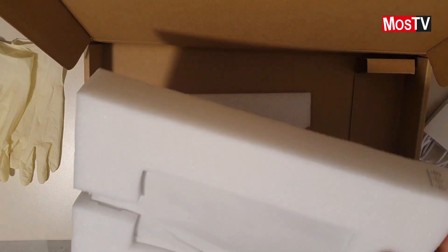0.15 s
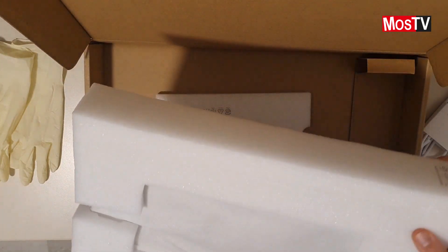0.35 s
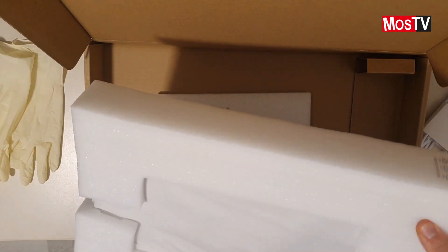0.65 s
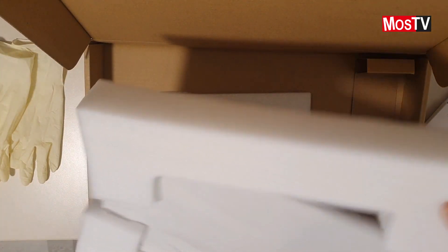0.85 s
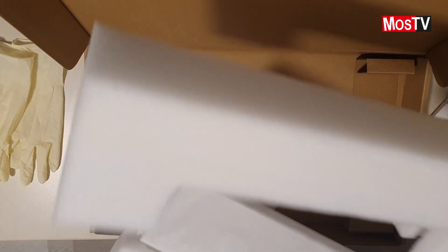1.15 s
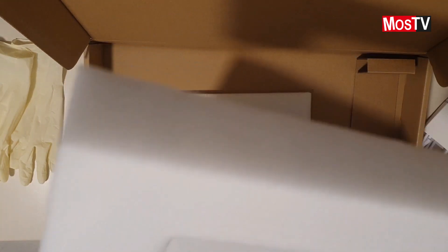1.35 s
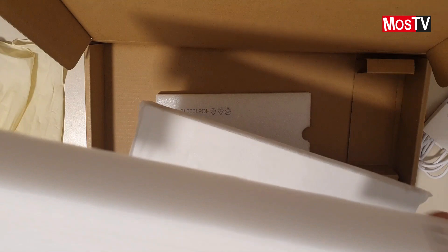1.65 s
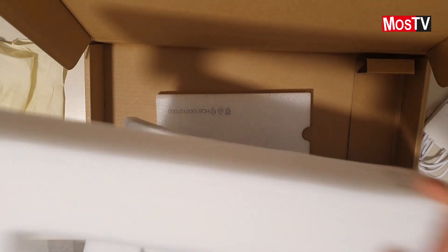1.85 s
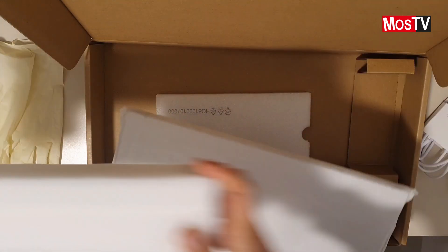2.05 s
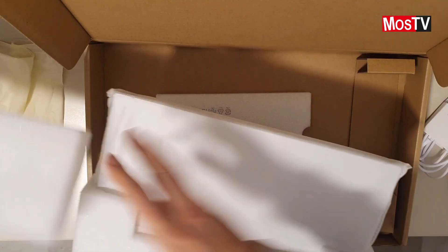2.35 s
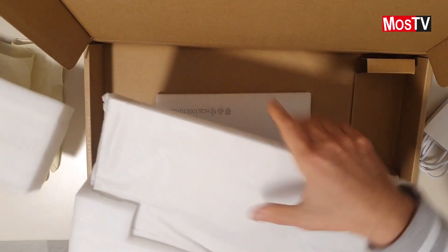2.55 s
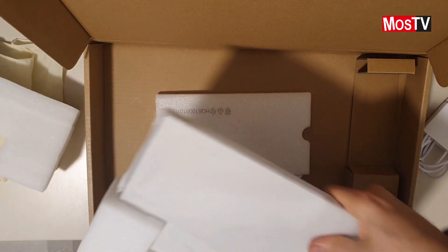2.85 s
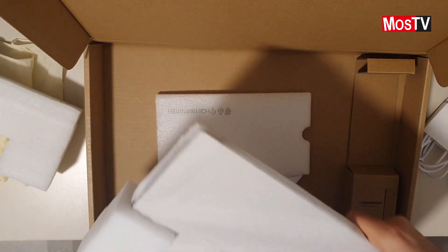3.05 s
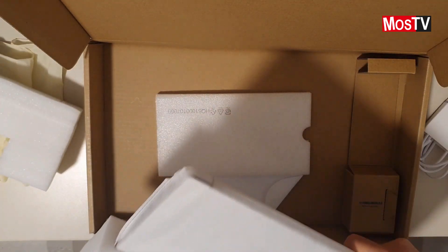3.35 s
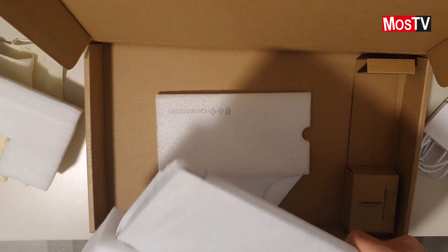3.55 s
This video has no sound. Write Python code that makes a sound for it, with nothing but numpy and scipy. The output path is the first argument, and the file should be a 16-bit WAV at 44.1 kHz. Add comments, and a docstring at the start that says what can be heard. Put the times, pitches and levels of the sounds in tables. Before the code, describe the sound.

Close up in a small room, a foam insert rubs loudly out of a hollow cardboard box, goes nearly quiet, lands with a low hollow thump, and a second piece knocks lightly and slides.

```python
"""Three strong scrapes as a foam insert is worked out of a cardboard box, then a faint hiss as it is carried
off. A hand brushes the foam with a tiny squeak, the insert thumps on the table with early reflections, and a
second piece is knocked and slid out. Rubs are coloured noise from dense random slips; knocks, crunches and
booms are short pulses and noise with decaying modes of box and table. A small room answers with tails of
decaying noise; steady low noise is its air."""
import sys
import numpy as np
from scipy import signal
from scipy.fft import rfft, irfft, next_fast_len
from scipy.io import wavfile
from scipy.ndimage import map_coordinates

SR = 44100
rng = np.random.default_rng(int(sys.argv[2]) if len(sys.argv) > 2 else 0)


def bounce(signal):
    """Save signal as a 16-bit WAV file at the path given by the first command-line argument."""
    frames = np.transpose(np.atleast_2d(signal))
    limited = np.clip(frames, -1, 1)
    pcm = np.round(limited * 32767).astype(np.int16)
    wavfile.write(sys.argv[1], SR, pcm)


N = 163170  # length in samples

# friction
SLIPS_PER_S, TILT_FROM_HZ = 14000, 2200
FLUTTER_DB, FLUTTER_PER_S = 1.6, 50
PATCHES_PER_OCTAVE, FLUTTER_FROM_HZ = 4, 600
LID_ECHO, LID_DELAY_S, LID_SWAY_S = 0.21, 0.004, 0.0006  # echo gain, delay and random change of delay
SCRAPE_FALL_S, GLIDE_FALL_S, BRUSH_FALL_S, SLIDE_FALL_S = 0.068, 0.12, 0.09, 0.15  # time to fade by 20 dB
HISS_DB = 1
SQUEAK_HZ, SQUEAK_SAG_HZ_PER_S, SQUEAK_JITTER_HZ = 1170, 900, 32
FLEX_RISE_S, FLEX_HOLD_S, FLEX_FALL_S = 0.073, 0.014, 0.14
# impacts
CRUNCH_T60_S, CRUNCH_DB = 0.074, -9
CRACK_T60_S, CRACK_DB = 0.02, 4.5  # the first snap of the crunch
KNOCK_DB, RING_DB = 9.5, -26.5
BOOM_RISE_S, RING_RISE_S = 0.015, 0.0017
BOOM_LAG_S, BOX_LAG_S = 0.00037, 0.00065  # left-right lag: fixed for the table, random spread for the box
# room and output
AIR_DB, RUB_ROOM_DB, IMPACT_ROOM_DB = -68, -8.5, 4.5
WALL_DELAY_S, TOP_HZ = 0.0016, 15800


def amp(db):
    """Decibels to gain."""
    return 10 ** (np.asarray(db) / 20)


def unit(x):
    """Scale to rms 1."""
    return x / np.sqrt(np.mean(x ** 2) + 1e-20)


def along(points, hz):
    """(Hz, value) points read on a log frequency axis."""
    f, v = np.transpose(points)
    return np.interp(np.log(hz + 1), np.log(f + 1), v)


def filtered(x, response):
    """x times a response of frequency."""
    n = x.shape[-1]
    m = next_fast_len(n + SR // 4)
    spectrum = rfft(x, m) * response(np.fft.rfftfreq(m, 1 / SR))
    return irfft(spectrum, m)[..., :n]


def spread(pair, alike):
    """Two unrelated signals become left and right of a given likeness."""
    turn = lambda hz: np.arccos(np.clip(along(alike, hz), -.99, .99)) / 2
    mid, side = filtered(pair, lambda hz: np.array([np.cos(turn(hz)), np.sin(turn(hz))]))
    return np.array([mid + side, mid - side])


def coloured(pair, colour, alike):
    """Stereo sound with the given spectrum and a middle of rms 1."""
    x = spread(filtered(pair, lambda hz: amp(along(colour, hz))), alike)
    return x / x.mean(0).std()


def pulse(colour, size=4096):
    """A causal, minimum-phase pulse of energy 1 with the given spectrum."""
    cepstrum = irfft(along(colour, np.fft.rfftfreq(size, 1 / SR)) * np.log(10) / 20)
    cepstrum[1:size // 2] *= 2
    cepstrum[size // 2 + 1:] = 0
    p = irfft(np.exp(rfft(cepstrum)))
    return p / np.linalg.norm(p)


def add(track, s, x):
    """Mix x into the track at time s."""
    part = track[..., max(round(s * SR), 0):][..., :x.shape[-1]]
    part += x[..., :part.shape[-1]]


def wobble(rate):
    """A smooth random curve with rate knots a second."""
    return map_coordinates(rng.standard_normal(N // 20), [np.arange(N) * rate / SR], mode="wrap")


def strokes(rows, fall_s, axis=3):
    """Gain of a row of swells: each rises to its peak, holds and dies away; axis picks the level column."""
    t = np.arange(N) / SR
    power = np.zeros(N)
    for row in rows:
        s, rise_s, hold_s = row[:3]
        rise_db = -20 * (np.maximum(s - t, 0) / rise_s) ** 2
        fall_db = -20 * np.maximum(t - s - hold_s, 0) / fall_s
        power += amp(row[axis] + rise_db + fall_db) ** 2
    return np.sqrt(power)


def flutter(x):
    """The contact patch keeps changing, so each part of the spectrum swells and sinks on its own."""
    hz, t, z = signal.stft(x, SR, nperseg=256)
    octave_steps = PATCHES_PER_OCTAVE * np.log2(1 + hz / FLUTTER_FROM_HZ)
    where = np.meshgrid(octave_steps, FLUTTER_PER_S * t, indexing="ij")
    field = map_coordinates(rng.standard_normal(z.shape[1:]), where, mode="wrap")
    return signal.istft(z * amp(FLUTTER_DB * field), SR, nperseg=256)[1][:, :N]


def friction(colour):
    """Foam cells catch and let go: dense tiny slips of uneven size that flutter and are mirrored by the lid."""
    # likeness of left and right: (frequency [Hz], likeness [-1 to 1])
    rub_alike = [(100, 0.74), (300, .8), (640, 0.73), (1400, 0.11), (7000, -0.0098)]
    slips = (rng.random((2, N)) < SLIPS_PER_S / SR) * rng.standard_normal((2, N))
    # the path off the lid changes as the foam moves
    late = np.arange(N) - SR * (LID_DELAY_S + LID_SWAY_S * wobble(5))
    mirrored = np.array([map_coordinates(side, [late]) for side in slips])
    return coloured(flutter(slips + LID_ECHO * mirrored), colour, rub_alike)


def room(x):
    """A fresh stereo noise tail of the room, its decay time set by frequency."""
    # decay: (frequency [Hz], time to fall 60 dB [s])
    room_t60 = [(150, 0.44), (600, 0.24), (2500, 0.37), (12000, 0.24)]
    # likeness of left and right: (frequency [Hz], likeness [-1 to 1])
    room_alike = [(290, 1), (640, -0.18), (1400, -0.19), (3500, -0.27), (12000, 0.22)]
    hz, t, z = signal.stft(rng.standard_normal((2, SR * 2 // 3)), SR, nperseg=256)
    decay = amp(-60 * t / along(room_t60, hz)[:, None])
    tail = spread(signal.istft(z * decay, SR, nperseg=256)[1], room_alike)
    # silent up to the wall delay, full at twice the delay
    tail = tail * np.clip(np.arange(tail.shape[1]) / SR / WALL_DELAY_S - 1, 0, 1)
    return signal.fftconvolve(np.atleast_2d(x), tail / np.linalg.norm(tail[0]), axes=1)[:, :N]


def room_air():
    """The quiet air of the room: steady noise, strongest in the bass."""
    # spectrum: (frequency [Hz], relative level [dB])
    air_colour = [(15, -34.5), (40, 1.5), (75, 2), (400, -23), (650, -23), (1080, -15), (1700, -27.5),
                  (12000, -40.5)]
    alike = [(80, 0.72), (500, 0.23), (2000, .15)]
    return amp(AIR_DB) * coloured(rng.standard_normal((2, N)), air_colour, alike)


def scraping():
    """Insert on box wall: each scrape has its own brightness and drives the hollow body of the box."""
    # scrapes: (full speed at [s], rise [s], hold [s], edge level before tilt [dB],
    # hollow body level [dB], treble tilt [dB per octave])
    scrapes = [(0.0, 0.11, 0.033, -54.5, -63.5, 2), (0.165, 0.097, 0.072, -33.5, -45.5, -0.3),
               (0.361, 0.081, 0.025, -29, -53.5, -0.43), (0.603, 0.079, 0.034, -50.5, -56.5, -4.7),
               (0.801, 0.059, 0.1, -32, -44.5, 1.54), (0.878, 0.014, 0.0013, -41.5, -36, -6)]
    # spectra of edge and body: (frequency [Hz], relative level [dB])
    scrape_colour = [(120, -51), (200, -29.5), (290, -13), (600, -12.5), (920, -2.5), (1400, -4),
                     (3800, -6), (6800, -10.5), (7900, -21), (10000, -18), (15700, -23.5)]
    body_colour = [(120, -12.5), (280, -8.5), (390, -0.5), (600, -4.5), (1100, -21)]
    grain = friction(scrape_colour)
    edge = np.zeros((2, N))
    for row in scrapes:
        tilted = filtered(grain, lambda hz: amp(row[-1] * np.log2(1 + hz / TILT_FROM_HZ)))
        edge += strokes([row], SCRAPE_FALL_S) * tilted
    return edge + strokes(scrapes, SCRAPE_FALL_S, axis=4) * friction(body_colour)


def flexing():
    """The handled box rumbles around its lowest resonance."""
    # flexes: (time [s], level [dB])
    flexes = [(0.121, -52), (0.24, -54.5), (0.81, -56), (0.943, -56.5), (1.163, -54), (2.253, -56),
              (3.029, -53.5), (3.14, -57.5)]
    colour = [(25, -11.5), (48, -3.0), (95, 5.5), (130, -8.5), (300, -39)]
    gain = strokes([(s, FLEX_RISE_S, FLEX_HOLD_S, db) for s, db in flexes], FLEX_FALL_S)
    return gain * coloured(rng.standard_normal((2, N)), colour, [(90, 0.81)])


def gliding():
    """Foam on foam: a band of hiss whose pitch follows sliding speed; firm contact adds a hollow tone."""
    # glides: (full speed at [s], rise [s], hold [s], base level [dB])
    glides = [(1.1, 0.14, 0.11, -57.5), (1.33, 0.13, 0.15, -76), (1.8, 0.078, 0.0072, -74)]
    # speed curve: (time [s], relative sliding speed)
    glide_speed = [(1.122, 1.03), (1.299, 1.07), (1.48, 1.25), (1.8, 1.12)]
    # spectra of hiss (at speed 1) and hollow tone: (frequency [Hz], relative level [dB])
    hiss_colour = [(1700, -21), (2850, 0), (4800, -7.5), (8000, -19), (15700, -23)]
    glide_colour = [(270, -9), (400, 4.5), (510, -7), (800, -5.5), (1500, -15), (15700, -36.5)]
    travel = np.cumsum(np.interp(np.arange(N) / SR, *np.transpose(glide_speed)))
    # reading the noise faster raises its pitch
    hiss = np.array([map_coordinates(side, [travel], mode="wrap") for side in friction(hiss_colour)])
    gain = strokes(glides, GLIDE_FALL_S)
    firmness = gain / gain.max()
    return gain * (amp(HISS_DB) * hiss + firmness * friction(glide_colour))


def brushing():
    """A hand brushes the foam: light strokes of friction noise."""
    # brushes: (full speed at [s], rise [s], hold [s], level [dB])
    brushes = [(1.495, 0.055, 0.02, -72), (1.91, 0.014, 0.0025, -81.5), (2.165, 0.038, 0.0069, -58),
               (2.243, 0.0061, 0.0084, -50.5)]
    # spectrum: (frequency [Hz], relative level [dB])
    brush_colour = [(300, -11.5), (1200, -3), (4200, -5), (8000, -13.5), (15700, -19.5)]
    return strokes(brushes, BRUSH_FALL_S) * friction(brush_colour)


def squeak():
    """Fingers stick and slip on the foam at an unsteady, falling pitch."""
    # squeaks: (full speed at [s], rise [s], hold [s], level [dB])
    squeaks = [(2.26, 0.017, 0.022, -62)]
    since = np.clip(np.arange(N) / SR - squeaks[0][0], -.5, .5)
    hz = SQUEAK_HZ - SQUEAK_SAG_HZ_PER_S * since + SQUEAK_JITTER_HZ * wobble(450)
    return strokes(squeaks, BRUSH_FALL_S) * unit(np.sin(2 * np.pi * np.cumsum(hz) / SR))


def ring(modes, t, rise_s, lags_s):
    """Decaying modes that build up over rise_s; each reaches left and right a lag apart."""
    sides = np.array([[.5], [-.5]])
    tones = np.zeros((2, len(t)))
    for (hz, db, t60), lag in zip(modes, lags_s):
        tones += amp(db - 60 * t / t60) * np.sin(2 * np.pi * hz * (t + sides * lag))
    return (1 - np.exp(-t / rise_s)) ** 2 * tones


def impacts(left_db=1.0):
    """Knocks, foam crunches, box ring and table boom; the main thump has early reflections."""
    # impacts on box and table; the rows at 2.4307 and 2.434 s are early reflections of the main thump:
    # (time [s], relative knock level [dB], relative crunch level [dB], relative boom level [dB],
    # pitch above which the knock is dulled [Hz])
    impact_rows = [(2.41, -16, -38, -11.5, 403), (2.423, -3, -22.5, -54, 2026),
                   (2.4307, -8.5, -22.5, -48, 894), (2.434, -15, -37, -38, 339),
                   (2.541, -19.5, -42.5, -35, 890), (2.582, -29.5, -43, -49, 1480),
                   (2.653, -48.5, -59.5, -68, 2000), (2.749, -25, -48, -30.5, 1200),
                   (2.876, -27, -50, -56, 600), (3.594, -45, -76, -50, 2010)]
    # modes of box and table: (frequency [Hz], relative level [dB], time to fall 60 dB [s])
    box_modes = [(179, -11, .45), (287, -6, .38), (418, -13, .4), (487, -9, .35), (528, -9, .38),
                 (612, -5, .34), (651, 6, .24), (752, -5, .26), (813, -4, .26), (861, -6, .24),
                 (957, -4, .22), (1023, -3, .15), (1200, -7, .2)]
    boom_modes = [(62.7, -20.5, 0.62), (85.95, -10, 0.59), (100.4, -3.5, 0.4), (118, -18, 0.39)]
    # spectra: (frequency [Hz], relative level [dB])
    knock_colour = [(50, -29), (150, -9.5), (400, -10.5), (650, -1.5), (1120, -12.5), (1550, -26.5),
                    (4000, -43.5)]
    crunch_colour = [(500, -2.5), (2100, -3), (3800, -9), (8000, -20.5), (15500, -26)]
    out, t = np.zeros((2, N)), np.arange(SR) / SR
    lags = BOX_LAG_S * rng.standard_normal(len(box_modes))
    crunch_decay = amp(-60 * t / CRUNCH_T60_S) + amp(CRACK_DB - 60 * t / CRACK_T60_S)
    for s, knock_db, crunch_db, boom_db, soft_hz in impact_rows:
        cushion = signal.butter(2, min(soft_hz, SR / 4), fs=SR, output="sos")
        crunch = signal.fftconvolve(rng.standard_normal(SR) * crunch_decay, pulse(crunch_colour))[:SR]
        hit = amp(crunch_db + CRUNCH_DB) * crunch
        add(hit, 0, amp(knock_db + KNOCK_DB) * signal.sosfilt(cushion, pulse(knock_colour)))
        box = signal.sosfilt(cushion, ring(box_modes, t, RING_RISE_S, lags))
        box = amp(knock_db + RING_DB) * box
        boom = amp(boom_db) * ring(boom_modes, t, BOOM_RISE_S, [BOOM_LAG_S] * len(boom_modes))
        add(out, s, (hit + box) * amp([[left_db], [-left_db]]) + boom)
        add(out, s, amp(IMPACT_ROOM_DB) * room(hit))
    return out


def sliding():
    """Strokes of friction noise as the second piece slides out."""
    # slides: (full level at [s], rise [s], hold [s], level [dB])
    swells = [(2.66, 0.06, 0.11, -64.5), (2.88, 0.11, 0.072, -53.5), (3.03, 0.034, 0.0082, -56),
              (3.27, 0.26, 0.084, -64.5), (3.46, 0.046, 0.017, -49.5), (3.678, 0.059, 0.038, -47.5)]
    # spectrum: (frequency [Hz], relative level [dB])
    slide_colour = [(150, -19), (420, -6), (950, -4), (3200, -7.5), (6300, -13.5), (8000, -20.5),
                    (15700, -21)]
    return strokes(swells, SLIDE_FALL_S) * friction(slide_colour)


def rubbing():
    """All the friction noise, the squeak and the room's answer to them."""
    contacts = scraping() + gliding() + brushing() + squeak() + sliding()
    return contacts + amp(RUB_ROOM_DB) * room(contacts.mean(0))


def scene():
    """Rubbing, flexing and impacts over the quiet air of the room."""
    return room_air() + rubbing() + flexing() + impacts()


def record(dry):
    """Nothing at or above the band limit is kept."""
    return filtered(dry, lambda hz: hz < TOP_HZ)


dry = scene()
out = record(dry)
bounce(out)
```